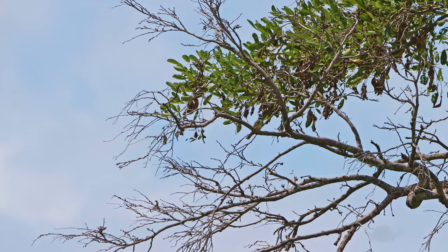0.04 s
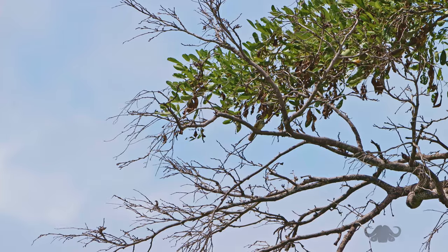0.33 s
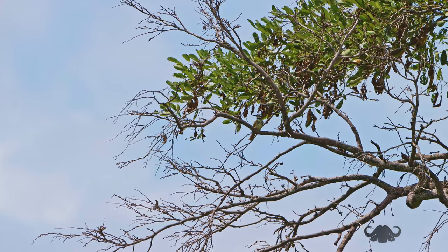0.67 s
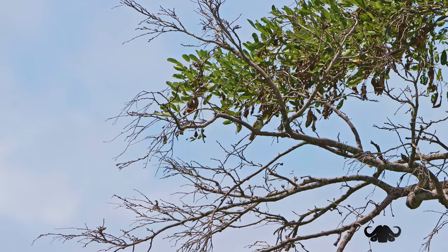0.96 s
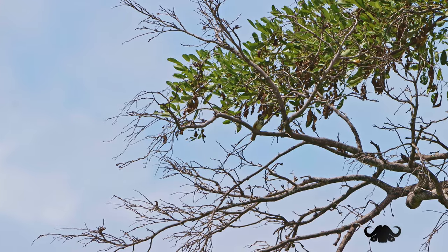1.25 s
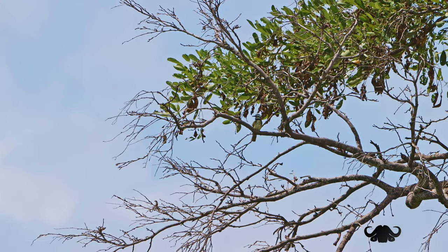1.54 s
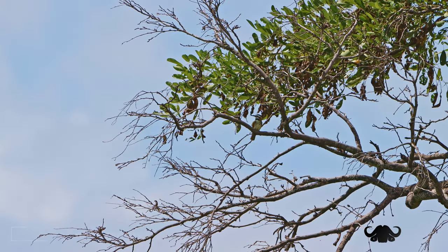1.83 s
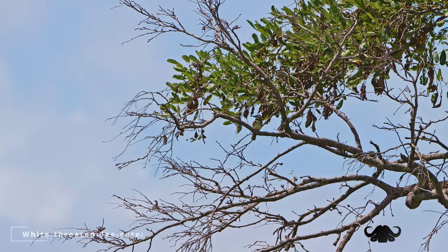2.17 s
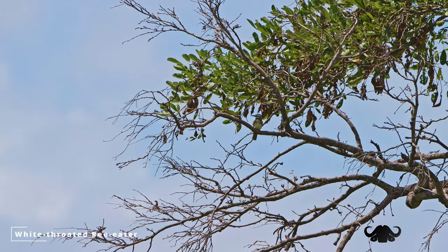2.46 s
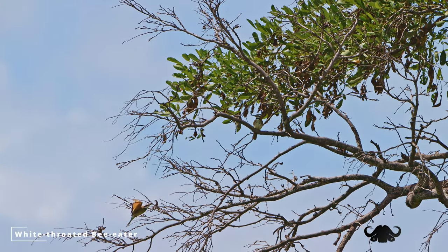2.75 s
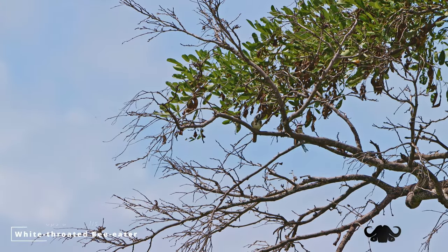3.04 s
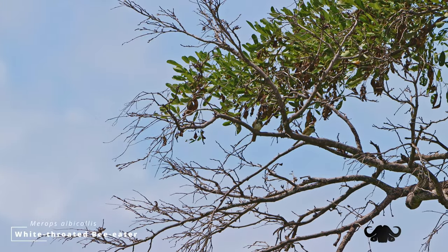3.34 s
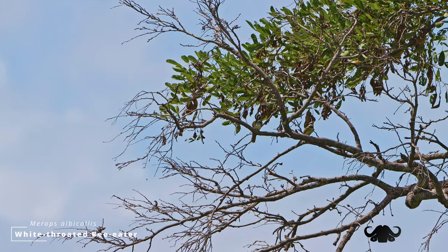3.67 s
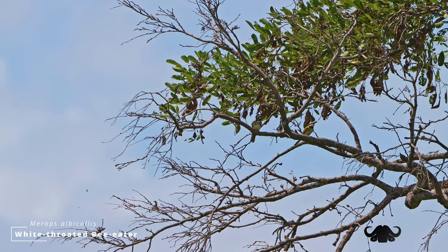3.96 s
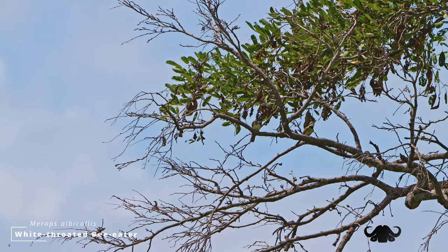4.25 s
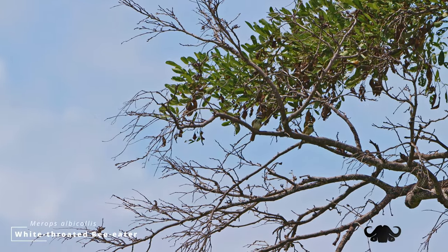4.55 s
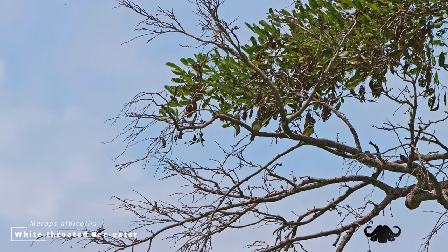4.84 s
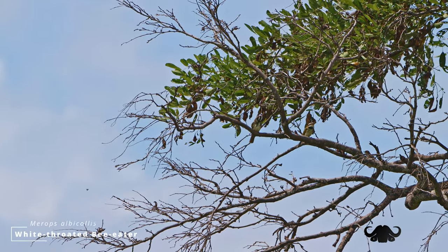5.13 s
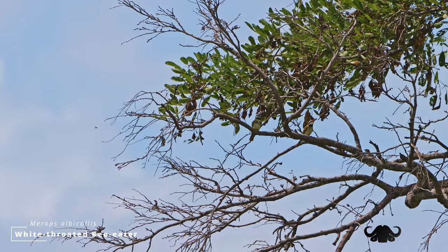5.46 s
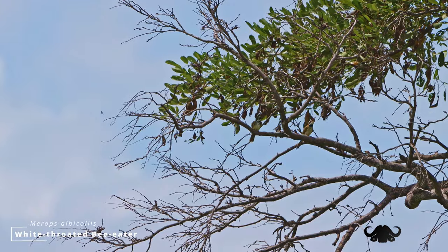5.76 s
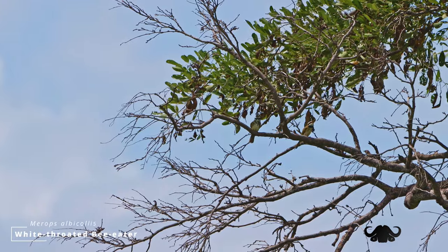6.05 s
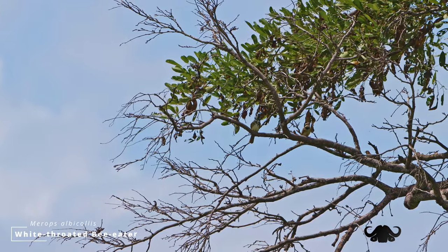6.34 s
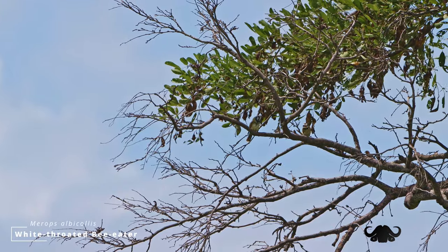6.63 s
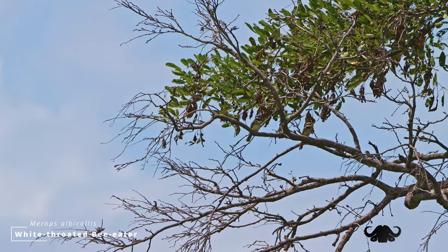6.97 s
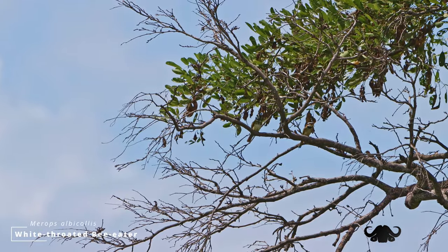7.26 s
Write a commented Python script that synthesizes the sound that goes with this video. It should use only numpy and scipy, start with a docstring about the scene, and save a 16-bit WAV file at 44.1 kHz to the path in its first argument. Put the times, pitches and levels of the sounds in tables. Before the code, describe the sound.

Outdoors, a dove coos and purrs in steady phrases amid small birds' whistles and chirps, as wind rumble on the microphone eases.

```python
"""A dove repeats its phrase (coo, rolling purr, soft coo) in open woodland on a breezy day.
It sings with its bill closed, through a swollen neck, while a second dove purrs farther off.
Small birds pipe, whistle, trill, chirp and scold from the trees, which scatter every note into an echo.
Wind rumbles on a nearly mono microphone and dies down, over a steady hush and a faint low drone."""
import sys
import numpy as np
from scipy import signal
from scipy.fft import rfft, irfft, next_fast_len
from scipy.io import wavfile
from scipy.ndimage import map_coordinates

SR = 44100
rng = np.random.default_rng(int(sys.argv[2]) if len(sys.argv) > 2 else 0)


def waveform_to_disk(signal):
    """Save audio, clipped to [-1, 1], as 16-bit WAV at the path in sys.argv[1]."""
    frames = np.transpose(np.atleast_2d(signal))
    scaled = np.clip(frames, -1, 1) * 32767
    samples = np.round(scaled).astype(np.int16)
    wavfile.write(sys.argv[1], SR, samples)


N = 321930


def amp(db):
    """Turn decibels into a number to multiply by."""
    return 10 ** (np.asarray(db) / 20)


def along(points, hz):
    """Read between the rows of a (Hz, value) table, with octaves evenly spaced."""
    pitches, values = np.transpose(points)
    return np.interp(np.log(hz + 1), np.log(pitches), values)


def wobble(rate, size):
    """A smooth random curve that heads for a new value rate times a second."""
    steps = rng.standard_normal(int(size * rate / SR) + 4)
    return map_coordinates(steps, [np.arange(size) * rate / SR])


def filtered(x, response):
    """Turn each frequency of x up or down by response(Hz)."""
    size = next_fast_len(N + SR // 2)
    return irfft(rfft(x, size) * response(np.fft.rfftfreq(size, 1 / SR)), size)[..., :N]


def noise(spectrum):
    """Noise of strength 1, its balance of low and high set by a table."""
    x = filtered(rng.standard_normal(N), lambda hz: amp(along(spectrum, hz)))
    return x / np.sqrt(np.mean(x ** 2) + 1e-20)


def add(track, s, sound):
    """Mix a sound into a track, starting at s seconds."""
    start = max(round(s * SR), 0)
    part = track[start:start + len(sound)]
    part += sound[:len(part)]


def note(length, pitch_hz, rise=.11, fade=.37, waver=.0036, flutter_db=2.5, tremble=0, tremble_hz=33.6):
    """A bird's pure tone gliding through the given pitches; rise and fade are shares of its length."""
    progress = np.linspace(0, 1, max(int(length * SR), 16))
    # a tremble shakes pitch and loudness together
    shake = np.clip(tremble, 0, 1) * np.sin(2 * np.pi * tremble_hz * length * progress)
    curve = np.polyfit(np.linspace(0, 1, len(pitch_hz)), pitch_hz, len(pitch_hz) - 1)
    hz = np.polyval(curve, progress) * (1 + waver * wobble(238.4, len(progress)) + .09 * shake)
    phase = 2 * np.pi * np.cumsum(hz) / SR
    swell = np.sin(np.pi / 2 * np.clip(np.minimum(progress / rise, (1 - progress) / fade), 0, 1))
    flutter = amp(flutter_db * wobble(85.8, len(progress)))
    return np.sqrt(2) * swell * (1 + shake) * flutter * np.sin(phase)


# How hard the wind blows. Each row: time in seconds, strength in dB.
GUSTS = [(0.05, -47.5), (0.22, -53), (0.39, -38), (0.62, -48), (0.9, -46.5), (1.15, -52.5), (1.45, -45.5),
         (2.0, -45.5), (2.55, -47.5), (3.05, -52), (3.3, -51.5), (3.55, -52.5), (3.8, -50.5), (4.1, -58.5),
         (4.6, -65.5), (5.2, -59.5), (5.55, -55.5), (5.95, -60.5), (6.3, -66), (6.6, -59.5), (7.3, -62.5)]
# Its deep rumble and the flutter just above. Each row: frequency in Hz, relative level in dB.
RUMBLE_TONE = [(8, -23), (14, 15), (32, 1), (48, 2.5), (60, -9.5), (80, -18), (110, -40), (200, -94)]
FLUTTER_TONE = [(35, -25), (55, 5.5), (85, 2.5), (115, -4), (140, -11.5), (200, -35), (400, -100)]

def wind(side_db=-36, swirl_db=2, swirls_per_s=11, breeze_db=-49):
    """Swirls of air beat on the microphone and slowly die down; the flutter follows their strength."""
    strength_db = np.interp(np.arange(N) / SR, *np.transpose(GUSTS))
    flutter_db = -60.5 + 1.1 * (strength_db - breeze_db)
    rumble = amp(strength_db + swirl_db * wobble(swirls_per_s, N))
    flutter = amp(flutter_db + swirl_db * wobble(swirls_per_s, N))
    mid, side = (rumble * noise(RUMBLE_TONE) + flutter * noise(FLUTTER_TONE) for _ in range(2))
    return mid + amp(side_db) * np.array([side, -side])


# The low drone. Each row: frequency in Hz, relative level in dB.
DRONE_TONE = [(30, -41), (52, -11.5), (64, -2.5), (76, -5.5), (88, -17.5), (110, -29), (250, -100)]

def drone(db=-64):
    """A faint, steady low rumble from far away."""
    return amp(db) * noise(DRONE_TONE)


# The hush of the landscape. Each row: frequency in Hz, relative level in dB.
HUSH_TONE = [(60, -28), (125, -3.5), (160, 1.5), (210, 3), (300, -4), (450, -7.5), (700, -6.5), (1200, -12),
             (2000, -14), (3300, -15), (4200, -18), (5200, -17.5), (7000, -20.5), (15500, -24)]
# How wide it sounds. Each row: frequency in Hz, level of the sides against the middle in dB.
HUSH_WIDTH = [(100, -26.5), (500, -21.5), (2000, -41), (4500, -33.5), (8000, -10), (15000, -10)]

def hush(db=-59):
    """Steady distant air and hiss; left and right differ mainly in the treble."""
    mid = noise(HUSH_TONE)
    side = filtered(noise(HUSH_TONE), lambda hz: amp(along(HUSH_WIDTH, hz)))
    return amp(db) * np.array([mid + side, mid - side])


# Each row: start in seconds, length in seconds, syllables a second, pitch in Hz, level in dB.
FAR_PURRS = [(.035, .38, 33.2, 831, -57.5), (1.96, .25, 24.6, 838, -59.5), (4.11, .27, 61, 787, -66),
             (5.5, .5, 29, 828, -65), (7.06, .09, 41, 910, -69)]

def far_dove():
    """A distant dove purrs; only the peak of each rolled syllable carries this far."""
    track = np.zeros(N)
    for s, length, rate, hz, db in FAR_PURRS:
        pitch = hz * np.array([1.07, 1, .9])
        for at in np.arange(s, s + length, 1 / rate):
            add(track, at, amp(db + rng.normal(0, 1)) * note(.0155, pitch, fade=.12, waver=.024))
    return track


# Each row: start in seconds, length in seconds, pitch in Hz, level in dB.
PIPING_NOTES = [(.06, .14, 3990, -64.5), (0.254, .14, 3880, -63), (.454, .14, 3703, -70),
                (0.623, .12, 3580, -76.5), (3.854, .16, 4525, -67), (6.151, .15, 4026, -67),
                (6.326, .145, 3877, -66), (6.509, 0.15, 3810, -66.5)]

def piper():
    """Far birds pipe long notes that swell as their pitch gently arches."""
    track = np.zeros(N)
    for s, length, hz, db in PIPING_NOTES:
        arch = hz * np.array([.945, .998, .997, .955])
        add(track, s, amp(db) * note(length, arch, rise=.5, fade=.5, waver=.003, flutter_db=1.1))
    return track


# Each row: start in seconds, length in seconds, first and last pitch in Hz, level in dB.
QUICK_WHISTLES = [(0.069, 0.11, 1700, 2950, -62.5), (.762, .014, 5470, 7000, -68.5),
                  (1.026, .014, 6060, 7200, -69), (2.767, .016, 6600, 5000, -64),
                  (3.187, .053, 2500, 2760, -63), (3.325, 0.048, 6700, 5600, -66),
                  (3.376, 0.042, 3430, 5480, -65), (6.945, .05, 2270, 2650, -71),
                  (6.996, .024, 5450, 3500, -61)]

def quick_whistles():
    """Short whistles that slip up or down."""
    track = np.zeros(N)
    for s, length, start_hz, end_hz, db in QUICK_WHISTLES:
        pitch = [start_hz, .97 * np.sqrt(start_hz * end_hz), end_hz]
        add(track, s, amp(db) * note(length, pitch, rise=.39, waver=.009, flutter_db=2))
    return track


# Each row: start in seconds, length in seconds, fall of each tick in octaves, level in dB.
TICKING_TRILLS = [(.372, 0.27, .05, -71), (0.921, 0.44, .1, -73), (1.512, 0.14, .05, -67.5),
                  (1.906, 0.29, .06, -70.5), (2.449, 0.31, .14, -68.5), (3.008, 0.13, 0.27, -67.5),
                  (3.163, 0.18, .05, -68.5), (3.655, 0.3, .29, -68), (4.28, 0.32, .06, -66.5),
                  (5.064, .54, .07, -70.5), (6.301, .24, .36, -66), (6.567, 0.23, .08, -72)]

def triller(centre_hz=5070):
    """Thin runs of tiny falling ticks; ticks that fall farther come more slowly."""
    track = np.zeros(N)
    for s, length, fall, db in TICKING_TRILLS:
        ticks_per_s = 33 - 12 * fall
        for at in np.arange(s, s + length, 1 / ticks_per_s):
            size, tune = rng.standard_normal(2)
            pitch = centre_hz * (1 + .022 * tune) * 2 ** (fall * np.array([.5, -.5]))
            add(track, at, amp(db + 1.2 * size) * note(.0185, pitch, rise=.55, fade=.13, waver=.0087))
    return track


def coo(length, pitch_hz, tremble, rise, fade):
    """One hollow, slightly hoarse dove note."""
    return note(length, pitch_hz, rise, fade, waver=.023, flutter_db=2.33, tremble=tremble)


# The near dove's phrases. Each row: roll's start in seconds and level in dB; run-up's length in
# seconds, first pitch in Hz and level in dB; opening coo's level in dB; lead-in's length in seconds
# and level in dB; closing coo's level in dB; after-coo's level in dB.
DOVE_PHRASES = [(0.922, -47.5, .078, 925, -50, -47, 0.14, -52, -50.5, -54),
                (2.313, -47.5, 0.083, 759, -52.5, -47.5, 0.13, -57.5, -51, -67),
                (3.715, -48.5, .024, 832, -47.5, -46, 0.094, -56.5, -49.5, -71),
                (5.11, -47.5, .024, 834, -55.5, -46, .1, -55, -51, -64),
                (6.518, -47.5, 0.019, 807, -47.5, -47, .085, -54.5, -51, -61.5)]
# Each list: the pitches in Hz that one coo glides through.
OPENING_TUNE = [969, 986.6, 945.6, 868, 830]
LEAD_IN_TUNE = [774, 868, 914, 904, 870]
CLOSING_TUNE = [804, 900, 925, 897, 850]
# How the swollen neck shapes the voice. Each row: frequency in Hz, boost or cut in dB.
NECK_TONE = [(300, -28), (600, 4), (800, -2), (1050, -2), (1180, -5), (1350, -21), (2500, -50)]

def near_dove(run_up_top_hz=957):
    """Sung with the bill closed: run-up and opening coo, lead-in and roll, closing coo and after-coo."""
    track = np.zeros(N)
    for (s, roll_db, run_up_s, run_up_hz, run_up_db, opening_db,
         lead_s, lead_db, closing_db, after_db) in DOVE_PHRASES:
        opening, closing = s - .424, s + .484  # start times in seconds
        run_up = coo(run_up_s, [run_up_hz, run_up_top_hz], tremble=.21, rise=.12, fade=.16)
        add(track, opening - run_up_s, amp(run_up_db) * run_up)
        add(track, opening, amp(opening_db) * coo(.082, OPENING_TUNE, tremble=.078, rise=.07, fade=.34))
        lead_in = coo(lead_s, LEAD_IN_TUNE, tremble=.5, rise=.063, fade=.14)
        add(track, s - lead_s, amp(lead_db) * lead_in)
        roll(track, s, roll_db)
        add(track, closing, amp(closing_db) * coo(.057, CLOSING_TUNE, tremble=.24, rise=.11, fade=.89))
        after_coo = coo(.083, CLOSING_TUNE, tremble=.45, rise=.45, fade=.54)
        add(track, closing + .094, amp(after_db) * after_coo)
    return filtered(track, lambda hz: amp(along(NECK_TONE, hz)))


# The pitches in Hz that the roll's long first syllable glides through.
ROLL_START_TUNE = [992, 927, 869, 802, 795]

def roll(track, s, db, count=13, first_s=.046, spacing_s=.0277, slowing_s=.0002):
    """One long syllable, then quick falling ones that slow, sink and fade as the dove runs out of air."""
    add(track, s, amp(db) * note(first_s, ROLL_START_TUNE, rise=.06, fade=.6, waver=.041))
    for k, (size, tune) in enumerate(rng.standard_normal((count, 2))):
        breath_spent = (k / (count - 1)) ** 4
        at = s + first_s + k * spacing_s + slowing_s * k * k
        level = db + size - 7 * breath_spent
        top_hz = (1040 - 100 * breath_spent) * (1 + .0088 * tune)
        pitch = top_hz * np.array([.99, .95, .84, .68])
        add(track, at, amp(level) * note(.02, pitch, rise=.22, fade=.6, waver=.015))
        # between syllables the voice goes on, lower and softer
        low_pitch = 830 * (1 + .034 * tune) * np.array([1.08, .98, .88])
        add(track, at + .013, amp(level - 7) * note(.0176, low_pitch, waver=.03))


# One chirp's notes. Each row: delay in seconds, length in seconds, four pitches in Hz, level change in dB.
CHIRP_NOTES = [(0, 0.0112, 7560, 6340, 5770, 5200, -7), (0.01, 0.0246, 3460, 3726, 3990, 3820, -4),
               (.055, .036, 4300, 4950, 5250, 5300, -1)]
# The chirps. Each row: start in seconds, level in dB, boost or cut of the opening tick in dB.
CHIRP_TIMES = [(1.55, -63.5, -12), (1.812, -61.5, -6), (2.058, -59, -1), (4.464, -59, -5),
               (4.709, -57.5, 1.5), (4.966, -55.5, 1), (6.887, -58.5, -20), (7.154, -55.5, 0.5)]

def chirper():
    """A three-note chirp, tick-tu-wee, a little different each time."""
    track = np.zeros(N)
    for s, db, tick_db in CHIRP_TIMES:
        for k, (delay, length, *pitches, part_db) in enumerate(CHIRP_NOTES):
            pitch = np.array(pitches) * (1 + rng.normal(0, .012))
            level = db + part_db + tick_db * (k == 0)
            tone = note(length, pitch, rise=.045, fade=.28, waver=.018, flutter_db=1)
            add(track, s + delay, amp(level) * tone)
    return track


# Each row: start in seconds, length in seconds, first and last pitch in Hz, base level in dB.
FALLING_WHISTLES = [(1.773, 0.27, 3630, 2630, -66.5), (2.151, 0.053, 3200, 2870, -63.5),
                    (3.135, 0.028, 2870, 2160, -65.5), (4.275, 0.1, 3500, 2690, -63.5),
                    (4.415, 0.073, 4850, 3880, -60.5), (4.833, 0.11, 3340, 2604, -57.5),
                    (4.978, 0.078, 4880, 4000, -60.5), (5.285, .105, 3230, 2580, -51),
                    (5.393, .26, 3546, 2480, -57.5), (5.419, 0.089, 4860, 3920, -60.5),
                    (7.117, 0.059, 3000, 2380, -67.5)]
# The share of the fall made at the start and after each quarter of a whistle.
FALL_SHAPE = [0, .22, .62, .9, 1]

def falling_whistles():
    """Clean whistles that fall, then level out as they weaken."""
    track = np.zeros(N)
    for s, length, start_hz, end_hz, db in FALLING_WHISTLES:
        pitch = start_hz + (end_hz - start_hz) * np.array(FALL_SHAPE)
        whistle = note(length, pitch, rise=.17, fade=.35, waver=.0046, flutter_db=2.2)
        weakening_db = np.linspace(3, -5, len(whistle))
        add(track, s, amp(db + weakening_db) * whistle)
    return track


# Each row: start in seconds, length in seconds, top pitch in Hz, level in dB.
ARCHED_WHISTLES = [(2.254, 0.13, 3190, -60.5), (2.383, 0.259, 3273, -56.5)]

def arched_whistles(top_s=.06, rounding_s=.026, slope_hz_per_s=7000):
    """Whistles that climb to a rounded top and slide down again."""
    track = np.zeros(N)
    for s, length, top_hz, db in ARCHED_WHISTLES:
        from_top_s = np.hypot(np.linspace(0, length, 6) - top_s, rounding_s) - rounding_s
        pitch = top_hz - slope_hz_per_s * from_top_s
        add(track, s, amp(db) * note(length, pitch, rise=.3, fade=.9, flutter_db=1.6))
    return track


# Each row: start in seconds, then levels in dB for the opening note, the buzz and the closing note.
SCOLD_CALLS = [(5.632, -72, -58.5, -53.5), (5.751, -62, -58.5, -52.5), (5.868, -49.5, -58, -51.5),
               (5.986, -53, -57, -51.5)]
# The hoarse hiss in a scold. Each row: frequency in Hz, relative level in dB.
HOARSE_TONE = [(3300, -41), (4100, -5), (4700, 4), (5500, -5), (6300, -12), (8000, -33)]

def scolder(low_per_s=72, high_per_s=100):
    """The two sides of a bird's voice box rasp at their own rates, then drop to a closing note."""
    track, hoarseness = np.zeros(N), np.zeros(N)
    for s, open_db, buzz_db, close_db in SCOLD_CALLS:
        add(track, s + .003, amp(open_db) * note(.0089, [2500, 3100, 3600], rise=.3))
        for at in np.arange(.018, .052, 1 / low_per_s):
            pitch = np.array([2950, 3280, 3150]) * (1 + rng.normal(0, .02))
            add(track, s + at, amp(buzz_db + 1.5) * note(.009, pitch, rise=.35, fade=.45, waver=.02))
        for at in np.arange(.008, .052, 1 / high_per_s):
            effort = np.sin(np.pi * at / .062)
            pitch = 4150 + 1400 * effort ** 2 * np.array([.15, .55, 1])
            rasp = note(.009, pitch, rise=.2, fade=.35, waver=.07, flutter_db=3)
            add(track, s + at + rng.normal(0, .0012), amp(buzz_db - 6.5 + 3.3 * effort) * rasp)
        swell = np.sin(np.linspace(0, np.pi, int(.054 * SR)))
        add(hoarseness, s + .0064, amp(buzz_db - 2.5) * swell)
        add(track, s + .054, amp(close_db) * note(.009, [3250, 2720, 2380], fade=.4))
        tail_pitch = np.array([2250, 2090, 2070]) * (1 + rng.normal(0, .015))
        add(track, s + .062, amp(close_db - 6) * note(.02, tail_pitch, waver=.015))
    return track + hoarseness * noise(HOARSE_TONE)


def with_ground(x, delay_s, db):
    """A sound and its later bounce off the ground."""
    out = x.copy()
    add(out, delay_s, amp(db) * x)
    return out


def in_leaves(x, share, ring_s=.072):
    """Twigs and leaves close around a hidden bird smear a share of its sound."""
    t = np.arange(SR // 20) / SR
    smear = rng.standard_normal(len(t)) * amp(-60 * t / ring_s)
    smeared = signal.fftconvolve(x, smear / np.linalg.norm(smear))[:N]
    return np.sqrt(1 - share) * x + np.sqrt(share) * smeared


# The woodland's echo. Each row: frequency in Hz, seconds it takes to fade by 60 dB.
ECHO_TIMES = [(500, 0.53), (1000, 0.43), (2100, 0.12), (3150, 0.57), (4300, 0.56), (5200, 0.61),
              (8000, 0.12)]

def among_trees(x, echo_db, gap_s=.011, count=10):
    """A sound with its echo off trunks and treetops; the moving leaves keep changing the echo."""
    hz, t, bands = signal.stft(rng.standard_normal((count, SR // 2)), SR, nperseg=256)
    decay = amp(-60 * t / along(ECHO_TIMES, hz)[:, None])
    tails = signal.istft(bands * decay, SR, nperseg=256)[1]
    tails /= np.linalg.norm(tails, axis=1, keepdims=True)
    out, hop = x.copy(), N // (count - 1) + 1
    padded = np.pad(x, (hop, 2 * hop))
    fade = np.sin(np.linspace(0, np.pi, 2 * hop))
    for k, tail in enumerate(tails):  # each overlapping stretch gets its own echo
        stretch = padded[k * hop:(k + 2) * hop] * fade
        echo = np.pad(signal.fftconvolve(stretch, tail), (k * hop, 0))[hop:]
        add(out, gap_s, amp(echo_db) * echo)
    return out


def scene():
    """Every bird sits in the centre; the farther ones bring more echo."""
    dove = among_trees(with_ground(near_dove(), delay_s=.008, db=-15), echo_db=-10)
    scolds = among_trees(scolder(), echo_db=-6)
    whistles = among_trees(falling_whistles() + arched_whistles() + quick_whistles(), echo_db=-10.5)
    chirps = among_trees(in_leaves(chirper(), share=.43), echo_db=-9)
    trills = among_trees(in_leaves(triller(), share=.48), echo_db=-13.5)
    far_birds = among_trees(far_dove(), echo_db=-7.5) + among_trees(piper(), echo_db=-4.5)
    return dove + scolds + whistles + chirps + trills + far_birds + wind() + drone() + hush()


def record(dry, silence_s=.036, top_hz=15800):
    """The sound starts after a moment of silence, with its highest treble cut off."""
    return filtered(dry * (np.arange(N) > silence_s * SR), lambda hz: hz < top_hz)


dry = scene()
out = record(dry)
waveform_to_disk(out)
```